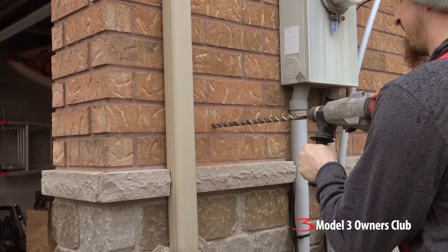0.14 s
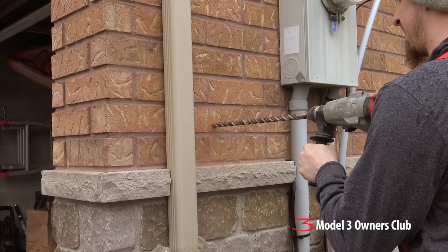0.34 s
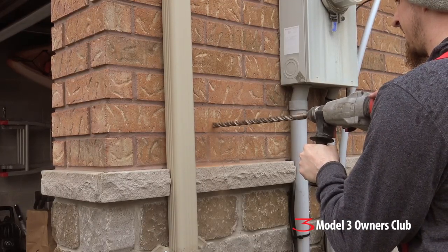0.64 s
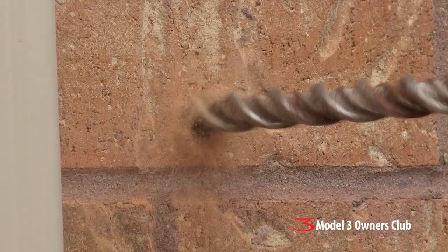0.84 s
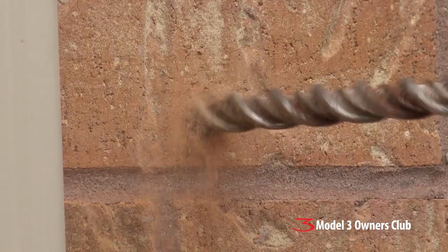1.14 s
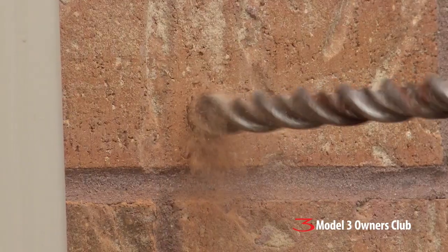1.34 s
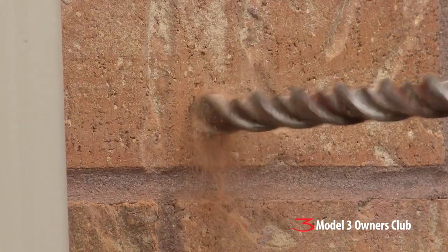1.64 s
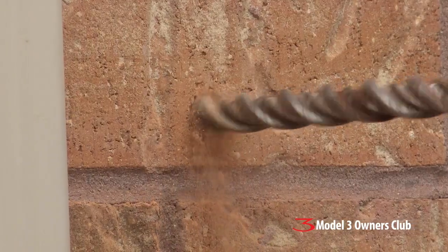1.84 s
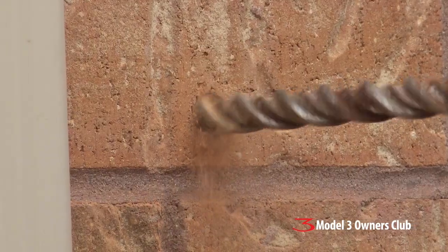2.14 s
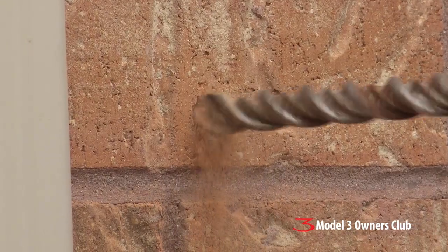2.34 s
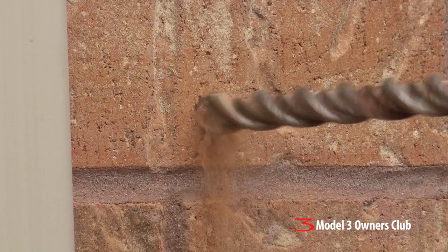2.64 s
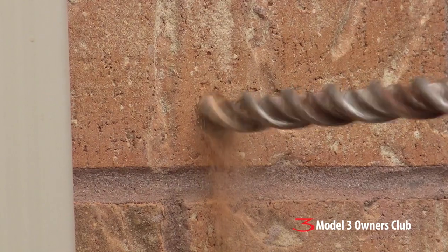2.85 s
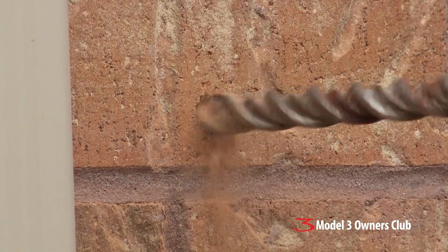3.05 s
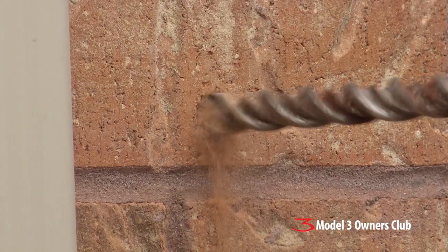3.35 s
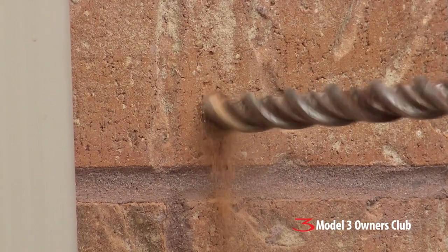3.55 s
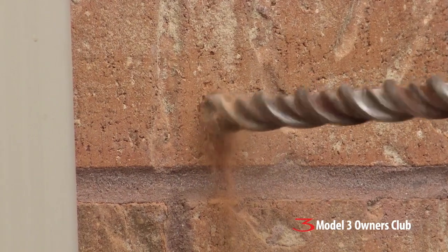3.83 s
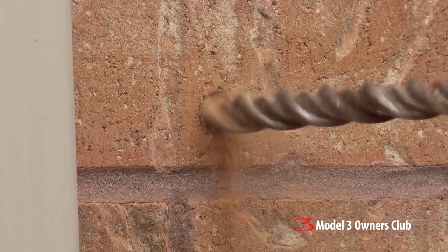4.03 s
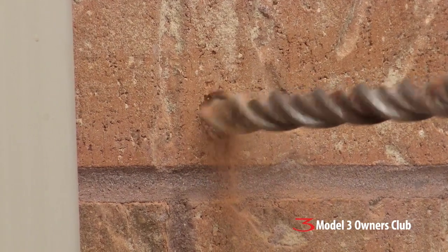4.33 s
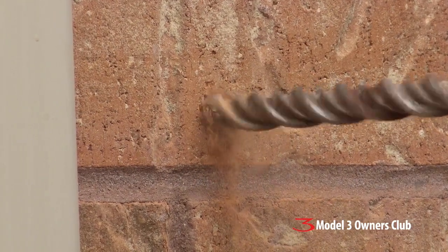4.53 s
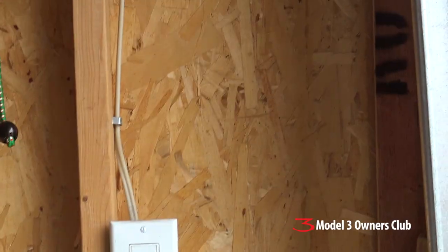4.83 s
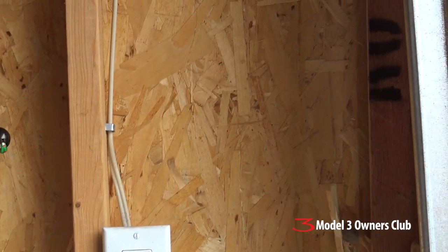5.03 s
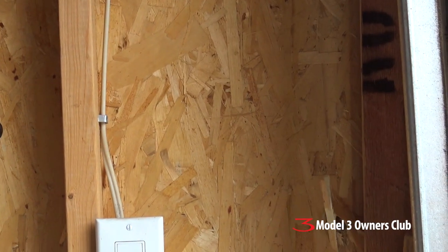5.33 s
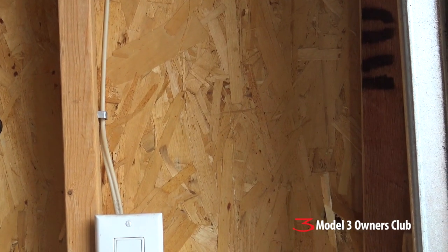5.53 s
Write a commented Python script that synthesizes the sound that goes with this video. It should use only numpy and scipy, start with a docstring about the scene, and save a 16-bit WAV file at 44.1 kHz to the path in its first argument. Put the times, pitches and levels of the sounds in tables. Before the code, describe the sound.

A hammer drill hammers rapidly into brick, bright and metallic, then closer and grittier, before its bit thuds and squeaks through a board indoors.

```python
"""A hammer drill bores into an outdoor brick wall, heard first from behind the worker, then close to the tip.
Repeated impacts excite the housing's comb of lines, the barrel's knock and the bit's lengthwise modes;
noise bursts are crushed brick, steady noise is the gears, and close by the flutes chirp as they stick and slip.
Then, from inside the garage: a muffled noise drone, the bit bursts through the board as damped modes,
rings freely with a squeak, and scrapes in its hole as swelling noise."""
import sys
import numpy as np
from scipy import signal
from scipy.fft import rfft, irfft
from scipy.io import wavfile

SR = 44100
rng = np.random.default_rng(int(sys.argv[2]) if len(sys.argv) > 2 else 0)


def generate_wav(sig):
    """Save sig (samples, or channels by samples) to the path in sys.argv[1] as 16-bit PCM at SR."""
    pcm = np.round(np.clip(np.atleast_2d(sig).T, -1, 1) * 32767).astype(np.int16)
    wavfile.write(sys.argv[1], SR, pcm)


N = 250488
T = np.arange(N) / SR

MOVE_CLOSE_S, MOVE_INSIDE_S = 0.93, 4.796  # the listening place changes
FREE_START_S = 4.922  # the bit comes free of the wall

# Noise spectrum of the rattling gears: frequency_hz, relative level_db
GEAR_SPECTRUM = [(30, -31), (55, -14.5), (300, -8.5), (800, -0.5), (1150, -7.5), (1500, 3.5), (1850, -2.5),
                 (2150, 5), (2700, -4), (4000, -5), (8000, -21), (15000, -40)]


def undb(db):
    """Level to amplitude: 20 dB is a factor of ten."""
    return 10 ** (np.asarray(db) / 20)


def unit(x):
    """Normalization to a root-mean-square value of 1."""
    return x / np.sqrt(np.mean(x ** 2))


def curves(table):
    """Linear interpolation in time of each column after the first."""
    s, *columns = np.transpose(table)
    return [np.interp(T, s, column) for column in columns]


def between(start, end, edge_s=0.002):
    """Gating: 1 inside a stretch of time, with linear ramps at its edges."""
    return np.clip(np.minimum(T - start, end - T) / edge_s + 0.5, 0, 1)


def walk(rate):
    """Band-limited chance: random knots (rate per second) joined by lines, with a spread near 1."""
    knots = rng.standard_normal(4096)
    return 1.2 * np.interp(T * rate, np.arange(len(knots)), knots)


def swells(events, floor_db=-120):
    """Incoherent addition: bell-shaped swells (s, peak dB, half length s) add in power over a steady floor."""
    power = undb(floor_db) ** 2
    for s, db, half_s in events:
        power = power + (undb(db) * np.exp(-((T - s) / half_s) ** 2)) ** 2
    return np.sqrt(power)


def spectral_gain(spectrum):
    """Frequency response: (Hz, dB) points joined along a logarithmic frequency axis."""
    hz, db = np.transpose(spectrum)
    bin_hz = np.maximum(np.arange(N // 2 + 1) * SR / N, 1)
    return undb(np.interp(np.log(bin_hz), np.log(hz), db))


def colour(x, spectrum):
    """Minimum-phase filtering: a one-sided cepstrum makes the response causal; the result has rms 1."""
    cepstrum = irfft(np.log(spectral_gain(spectrum)), N)
    cepstrum[N // 2:] = 0
    return unit(irfft(rfft(x) * np.exp(rfft(2 * cepstrum)), N))


def grit(spread_db):
    """Crackling noise: dense tiny cracks whose sizes, held for 16 samples, are exponentially spread in dB."""
    size = np.repeat(np.minimum(rng.exponential(size=N // 16 + 1), 6), 16)[:N]
    return rng.standard_normal(N) * undb(spread_db * size)


def blows(beat, jitter_s):
    """Impact timing: number of the latest blow and the time since it; each lands a little off the beat."""
    whole_beats = np.arange(-1, int(beat[-1]) + 2)
    times = np.interp(whole_beats, beat, T) + jitter_s * rng.standard_normal(1024)[:len(whole_beats)]
    times[0] = -1
    times = np.sort(times)
    number = np.searchsorted(times, T) - 1
    return number, T - times[number]


def per_blow(number, spread):
    """Impact variability: a random value held for the length of each blow."""
    return spread * rng.standard_normal(1024)[number]


def buffet():
    """Wind turbulence: low-pitched noise rises in lumpy gusts on the microphone near the drill."""
    # Gusts before their flutter: time_s, peak level_db, half length_s
    gusts = [(1.02, -38, 0.11), (1.58, -38, .07), (1.88, -38, 0.9), (1.93, -38, 0.14)]
    # Noise spectrum of the wind: frequency_hz, relative level_db
    wind_spectrum = [(20, -35), (45, 0), (90, 1.5), (170, -1), (270, 1.5), (400, -3), (700, -23.5)]
    flutter = undb(2.6 * walk(30))
    return swells(gusts) * flutter * colour(grit(0), wind_spectrum)


def muffled():
    """Transmission through the wall: the drill is reduced to a wavering, filtered noise drone."""
    # Spectrum of the drone: frequency_hz, relative level_db
    drone_spectrum = [(35, -26), (120, -6), (500, -11), (750, -5), (900, -9.5), (2600, -7.5), (8000, -16.5),
                      (15500, -29)]
    level_db = -38 + 2.3 * walk(40) - 2.9 * between(4.895, 6)  # softer just before the burst and after it
    return undb(level_db) * colour(grit(1), drone_spectrum)


def board_thuds():
    """Modal decay: each burst excites damped modes of the board, with random polarity."""
    # Blows on the board: time_s, level_db
    bursts = [(4.916, -21), (4.945, -31)]
    # Modes of the board: frequency_hz, relative level_db, 60 dB decay time t60_s
    board_modes = [(141.6, -2.5, 0.15), (167, -7, 0.27), (246, -11, 0.068), (292, -3, 0.061),
                   (414, 2, 0.059), (521, 2, 0.071), (632, 0, 0.098), (765, -3, 0.049), (982, -2, 0.059),
                   (1250, 0, 0.028)]
    thuds = 0
    for s, burst_db in bursts:
        since = np.maximum(T - s, 0)
        push = 1 - np.exp(-since / 0.0012)  # wood yields softly
        for hz, db, t60 in board_modes:
            decay = undb(burst_db + db - 60 * since / t60)
            thuds = thuds + push * decay * np.cos(2 * np.pi * hz * since) * rng.choice([-1, 1])
    return thuds


def squeak():
    """Stick-slip friction of shank on board: a thin, wavering tone that rises a little, then drops."""
    # Central pitch before its waver: time_s, pitch_hz
    squeak_pitch = [(4.97, 3230), (5.058, 3410), (5.08, 3110)]
    hz = curves(squeak_pitch)[0] + 70 * walk(500)
    gain = undb(-40.5 + 3 * walk(120)) * between(4.968, 5.118, edge_s=0.02)
    return gain * np.sin(2 * np.pi * np.cumsum(hz) / SR)


def free_ring(number, age):
    """Reduced damping: out of the wall's grip the bit rings on, sags and dies away, with a squeal on each family."""
    # Two families of lengthwise modes, each: frequency_hz, relative level_db
    free_modes = [(5290, 2), (5380, -4), (6400, -23)], [(10800, -5), (10900, -7), (13200, -23)]
    # Squeals over the steady rings: time_s, first family level_db, second family level_db
    squeals = [(4.977, -20.5, -41), (5.085, -45, -22)]
    end_s, attack_s, squeal_half_s = 5.14, 0.024, 0.018
    sag_db_per_s, release_db_per_s = 22, 400
    free_s = np.maximum(T - FREE_START_S, 0)
    attack = np.sqrt(1 - np.exp(-free_s / attack_s))
    fall_db = -sag_db_per_s * free_s - release_db_per_s * np.maximum(T - end_s, 0)
    first_gain = swells([(s, db, squeal_half_s) for s, db, _ in squeals], floor_db=-26.5)
    second_gain = swells([(s, db, squeal_half_s) for s, _, db in squeals], floor_db=-29.5)
    rings = 0
    for gain, modes in zip((first_gain, second_gain), free_modes):
        rings = rings + gain * bit_ring(number, age, modes, rise_s=0.00081, decay_s=0.017,
                                        scatter_db=2, detune=0.0034, rattle=0.11)
    return attack * undb(fall_db) * rings


def breakthrough():
    """Change of boundary: the bit thuds through the board, rings freely, then rasps by friction in its hole."""
    # Scrapes: time_s, half length_s, board rumble level_db, rasp level_db, splinter level_db;
    # each level stands before the normalized noise it scales
    scrapes = [(4.929, .015, -27, -29, -37), (4.955, 0.034, -29, -30, -25), (5.037, .028, -38, -33, -29.5),
               (5.29, 0.013, -39, -40, -34), (5.402, .042, -37, -30, -44),
               (5.469, 0.021, -49, -32.5, -36.5), (5.612, 0.039, -31, -28, -43)]
    # Noise spectra of board rumble, rasp and splinters: frequency_hz, relative level_db
    rumble_spectrum = [(40, -38), (70, -16), (110, -4), (230, 2.5), (330, -1.5), (500, -10.5), (900, -39)]
    rasp_spectrum = [(250, -23), (430, -2.5), (620, 1.5), (1000, -3.5), (1500, -9), (2500, -12.5),
                     (4000, -13.5), (8000, -36)]
    splinter_spectrum = [(1500, -7), (3300, -3.5), (5200, 4.5), (7500, 2), (10000, 0.5), (13000, -6),
                         (15500, -13)]
    blow_rate_hz = 68 + 5 * walk(12)
    number, age = blows(np.cumsum(blow_rate_hz) / SR, jitter_s=0.0011)
    rings = free_ring(number, age) + squeak()
    times, halves, rumble_db, rasp_db, splinter_db = np.transpose(scrapes)
    chatter = 1.8 + np.exp(-age / 0.0065)  # each blow stirs the rubbing
    # the floors are the bit's steady rubbing
    rumble_gain = swells(zip(times, rumble_db, halves), floor_db=-39.5)
    rasp_gain = swells(zip(times, rasp_db, halves), floor_db=-42.5)
    splinter_gain = swells(zip(times, splinter_db, halves), floor_db=-45.5)
    rumble = rumble_gain * colour(grit(1.2) * chatter, rumble_spectrum)
    rasp = rasp_gain * colour(grit(2.4) * chatter, rasp_spectrum)
    splinters = splinter_gain * colour(grit(2.5) * chatter, splinter_spectrum)
    return (rings + rumble + rasp + splinters) * between(FREE_START_S, 6) + board_thuds()


def rebound(age):
    """Elastic rebound: the bit's second, softer landing 7.5 ms after the blow, as a swell from 0 to 1."""
    return np.exp(-((age - 0.0075) / 0.0015) ** 2)


def lull(beat, depth):
    """Cyclic modulation: the noise sinks just before each blow, while the piston draws back."""
    from_lull = (beat + 0.54) % 1 - 0.5
    return 1 - depth * np.exp(-(from_lull / 0.06) ** 2)


def gear_rattle(age, spread_db, bounce):
    """Gear impacts merge into steady coloured noise, which swells as the bit rebounds."""
    return colour(grit(spread_db) * (1 + bounce * rebound(age)), GEAR_SPECTRUM)


def crush(number, age, spectrum, decay_s, scatter_db, grit_db, crack, bounce):
    """Brittle fracture: a sharp crack and a burst of breaking brick, stirred again as the bit rebounds."""
    fall = np.exp(-age / decay_s) + crack * np.exp(-age / 0.0008) + bounce * rebound(age)
    burst = (1 - np.exp(-age / 0.00014)) * fall * undb(per_blow(number, scatter_db))
    return colour(grit(grit_db) * burst, spectrum)


def knock(number, age, decay_s, scatter_db):
    """Modal impact: the striker rings the barrel alike at every blow; higher modes die sooner."""
    # Modes of the barrel, lowest first: frequency_hz, relative level_db
    barrel_modes = [(1390, -5.5), (1500, -2), (2120, 0.5)]
    lowest_hz = barrel_modes[0][0]
    ring = 0
    for hz, db in barrel_modes:
        decay = np.exp(-age / decay_s * (hz / lowest_hz) ** 2)
        ring = ring + undb(db) * np.sin(2 * np.pi * hz * age) * decay
    return unit(ring * (1 - np.exp(-age / 0.001)) * undb(per_blow(number, scatter_db)))


def housing(beat, orders, smear, waver_db):
    """Periodic excitation gives a harmonic comb: the lines swell together just after each blow."""
    order, level_db = np.transpose(orders)
    mirrored = np.log(undb(np.r_[level_db, level_db[::-1]]))
    lag = np.imag(signal.hilbert(mirrored))[:len(order)]  # phase that belongs to the level curve
    lag = lag + smear * rng.standard_normal(len(order))  # walls and casing spread the knock in time
    stroke = beat - 0.08 + 0.0058 * walk(50)  # small slips of the piston blur the upper lines
    comb = 0
    for k, db, phase in zip(order, level_db, lag):
        comb = comb + undb(db + waver_db * walk(14)) * np.cos(2 * np.pi * k * stroke - phase)
    return unit(comb)


def bit_ring(number, age, modes, rise_s, decay_s, scatter_db, detune, rattle, strike=0, strike_s=0.002):
    """Repeated modal excitation: each blow rings the steel anew; grip shifts the modes, rattling blurs them."""
    ring = 0
    for hz, db in modes:
        cycles = hz * (1 + per_blow(number, detune)) * age
        cycles = cycles + per_blow(number, 0.98) + rattle * walk(400)
        ring = ring + undb(db + per_blow(number, scatter_db)) * np.sin(2 * np.pi * cycles)
    # the strike adds a stronger start, until the tip sinks in
    fall = np.exp(-(age / decay_s) ** 2) + strike * np.exp(-(age / strike_s) ** 2)
    return unit(ring * (1 - np.exp(-age / rise_s)) * fall)


def chirps(beat, number, age, grip_db, swing_db, scatter_db, length_s):
    """Stick-slip of the flutes in the hole: tiny chirps between blows, loudest at each quarter turn."""
    blows_per_turn, catches_per_turn = 15, 4
    grip = np.cos(2 * np.pi * catches_per_turn * beat / blows_per_turn)
    catch = undb(grip_db + swing_db * grip + per_blow(number, scatter_db))
    slip = np.exp(-((age - 0.008 - per_blow(number, 0.004)) / length_s) ** 2)
    slip_hz = 3270 + per_blow(number, 169.9) + 110 * walk(600)
    return catch * slip * np.sin(2 * np.pi * np.cumsum(slip_hz) / SR)


def drill_wide():
    """Superposition of impact responses behind the worker: the bright ring of the bit leads."""
    # Speed of the drill: time_s, blow_rate_hz
    wide_speed = [(0, 64.97), (0.3, 64.82), (0.7, 66.04), (0.92, 66.6)]
    # Housing tone: order (multiple of the blow rate), relative level_db
    wide_orders = [(1, -24.5), (2, -22), (3, -9.5), (4, -18), (5, -7.5), (6, -2.5), (7, -16), (8, -9),
                   (9, -0.5), (10, -9), (11, -11.5), (12, -5), (13, -4.5), (14, -29), (15, -5.5), (16, -5),
                   (17, -8.5), (18, -12), (19, -9), (20, -11)]
    # Noise spectrum of crushed brick: frequency_hz, relative level_db
    wide_crush = [(1500, -27), (2400, -25), (3000, -12), (4300, -8), (5700, -1), (7600, -4), (8800, -9),
                  (10900, -0.5), (13300, -7), (14200, -22), (15500, -14)]
    # Two families of the bit's lengthwise modes, each: frequency_hz, relative level_db
    wide_modes = [(5300, 1), (5540, 2), (5850, 3), (6100, -2)], [(10800, 7), (11100, -8), (10800, -16)]
    housing_db, barrel_db, gears_db, brick_db = -34.5, -39.5, -32, -27
    first_db, second_db = -33, -28.3 - 2.5 * T  # only the second ring fades
    beat = np.cumsum(curves(wide_speed)[0]) / SR + 0.215
    number, age = blows(beat, jitter_s=0.0001)
    body = undb(housing_db) * housing(beat, wide_orders, smear=0.85, waver_db=1.2)
    gears = undb(gears_db) * gear_rattle(age, spread_db=0.93, bounce=0.33)
    brick = undb(brick_db) * crush(number, age, wide_crush, decay_s=0.014, scatter_db=0.85,
                                   grit_db=1.0, crack=0.3, bounce=0.21)
    first = undb(first_db) * bit_ring(number, age, wide_modes[0], rise_s=0.0008, decay_s=0.014,
                                      scatter_db=2.5, detune=0.014, rattle=0.12)
    second = undb(second_db) * bit_ring(number, age, wide_modes[1], rise_s=0.00089, decay_s=0.0067,
                                        scatter_db=0.5, detune=0.003, rattle=0.031)
    barrel = undb(barrel_db) * knock(number, age, decay_s=0.0033, scatter_db=2)
    return barrel + (body + gears + brick) * lull(beat, depth=0.5) + first + second


def drill_close():
    """Load-dependent impact response near the tip: knock and grinding grow with pressure, and flutes chirp."""
    # Speed of the drill: time_s, blow_rate_hz
    close_speed = [(0.94, 62.57), (1.3, 61.7), (1.75, 62.28), (2.3, 61.61), (3.2, 62.22), (3.4, 61.1),
                   (3.55, 61.67), (3.8, 60.6), (3.95, 61.58), (4.15, 61.26), (4.79, 61.45)]
    # Housing tone: order (multiple of the blow rate), relative level_db
    close_orders = [(1, -19.5), (2, -22), (3, -8), (4, -18.5), (5, -18.5), (6, -10.5), (7, -6), (8, -9.5),
                    (9, 1.3), (10, -13.5), (11, -12.5), (12, -3), (13, 0.5), (14, -9), (15, -7.5), (16, -1),
                    (17, -14), (18, -10.5), (19, -15.5), (20, -3.5), (21, -18), (22, -10), (23, -2.5),
                    (24, -4.5), (25, -3), (26, -23.5), (27, -2), (28, -4), (29, -3.5), (30, -17), (31, -4),
                    (32, -1.5), (33, -0.5)]
    # Noise spectrum of crushed brick: frequency_hz, relative level_db
    close_crush = [(1300, -23), (2200, -7), (3500, -6.5), (4800, -8.5), (5600, -9), (6200, -5.5),
                   (6620, -12), (6950, -8.5), (7700, -7.5), (8400, -13), (11200, -5), (13200, -9.5),
                   (14200, -23), (15500, -18.5)]
    # Two families of the bit's lengthwise modes, each: frequency_hz, relative level_db
    close_modes = [(5250, -9), (5430, 2), (5630, 0), (6030, -4.5), (6950, -7.5), (7770, -4.5)], [(11030, 6),
                   (10700, -5), (10400, -15)]
    # The tip bites into harder brick: start_s, end_s, rise of the first ring_db
    bites = [(1.472, 1.938, 6.5), (4.075, 4.376, 5.5), (4.53, 4.593, 5)]
    beat = np.cumsum(curves(close_speed)[0]) / SR + 0.855
    number, age = blows(beat, jitter_s=0.0001)
    boring_s = np.maximum(T - MOVE_CLOSE_S, 0)
    slack = np.exp(-boring_s / 1.04)  # the pressure builds gradually
    bite_db = sum(db * between(start, end, edge_s=0.032) for start, end, db in bites)
    machine_db = -2.5 * slack
    housing_db, barrel_db = -31.5 + machine_db, -35 + machine_db
    gears_db = -32.5 + machine_db + 1.5 * walk(18)
    brick_db = -30.5 + 0.29 * bite_db  # the crushing rises by a share of the ring's dB
    first_db = -36.5 - 1.1 * boring_s + bite_db  # the deepening hole damps the first ring
    second_db = -35 - 4.5 * slack
    chirp_db = -5.5 * slack  # the flutes catch less while the hole is shallow
    body = undb(housing_db) * housing(beat, close_orders, smear=1.32, waver_db=1.5)
    barrel = undb(barrel_db) * knock(number, age, decay_s=0.0025, scatter_db=1)
    gears = undb(gears_db) * gear_rattle(age, spread_db=0.69, bounce=0.2)
    brick = undb(brick_db) * crush(number, age, close_crush, decay_s=0.015, scatter_db=0.86,
                                   grit_db=1.66, crack=0.76, bounce=0.17)
    first = undb(first_db) * bit_ring(number, age, close_modes[0], rise_s=0.0006, decay_s=0.015,
                                      scatter_db=1, detune=0.0058, rattle=0.07, strike=3.1, strike_s=0.0027)
    second = undb(second_db) * bit_ring(number, age, close_modes[1], rise_s=0.003, decay_s=0.0065,
                                        scatter_db=1, detune=0.0012, rattle=0.072)
    slips = undb(chirp_db) * chirps(beat, number, age, grip_db=-34.5, swing_db=6.5,
                                    scatter_db=3, length_s=0.0039)
    return barrel + (body + gears + brick) * lull(beat, depth=0.55) + first + second + slips


def scene():
    """Interchannel phase: three listening places in turn, each nearly in the middle of the stereo image."""
    # The two microphone ports differ a little: frequency_hz, side minus middle level_db
    port_difference = [(80, -20), (350, -18), (700, -26.5), (1400, -67), (2800, -63.5), (5500, -27.5),
                       (9500, -22.5), (14000, -30)]
    behind = drill_wide() * between(-1, MOVE_CLOSE_S)
    close = (drill_close() + buffet()) * between(MOVE_CLOSE_S, MOVE_INSIDE_S)
    inside = muffled() * between(MOVE_INSIDE_S, 6) + breakthrough()
    mid = behind + close + inside
    # a quarter-cycle shift makes the side signal a small phase difference between the ports
    side = irfft(1j * rfft(mid) * spectral_gain(port_difference), N)
    return np.array([mid + side, mid - side])


def record(dry):
    """Band limitation: a steep elliptic low-pass at the recorder removes the top of the treble."""
    top_hz = 15750
    low_pass = signal.ellip(14, 0.1, 90, top_hz, fs=SR, output="sos")
    return signal.sosfilt(low_pass, dry)


dry = scene()
out = record(dry)
generate_wav(out)
```